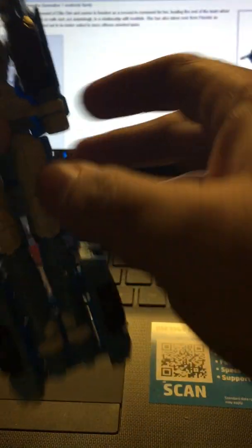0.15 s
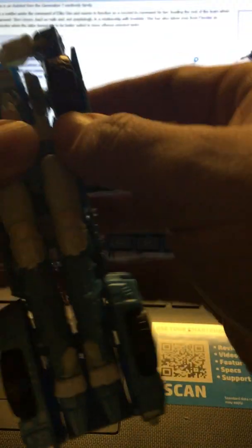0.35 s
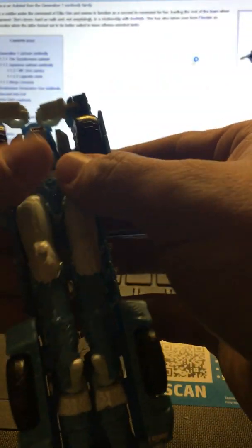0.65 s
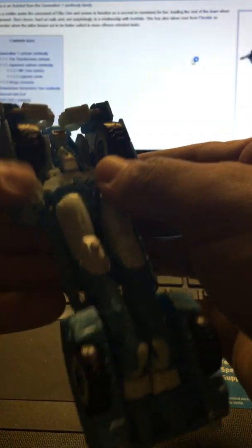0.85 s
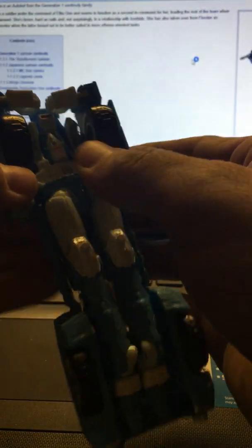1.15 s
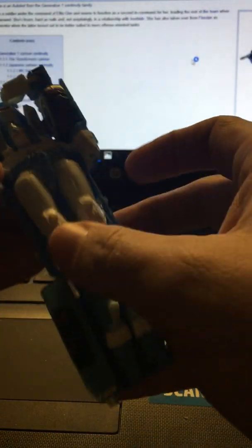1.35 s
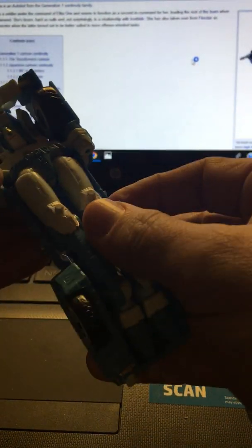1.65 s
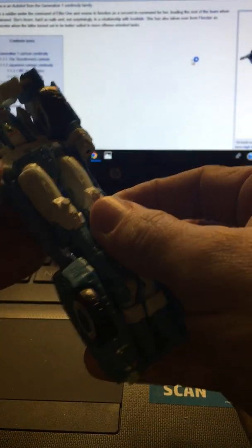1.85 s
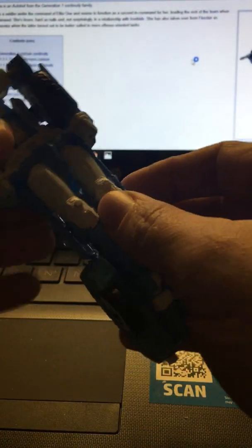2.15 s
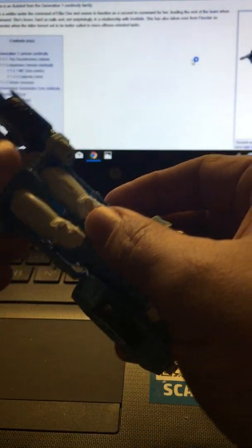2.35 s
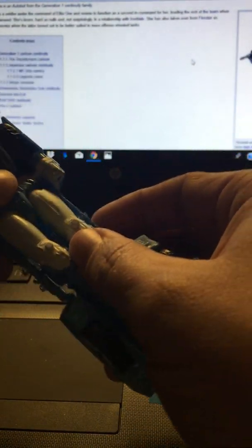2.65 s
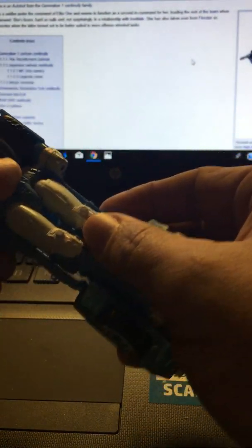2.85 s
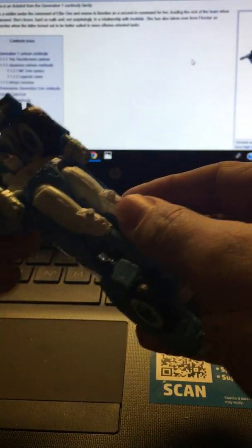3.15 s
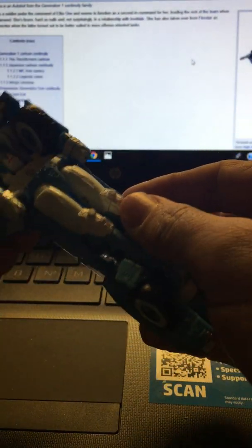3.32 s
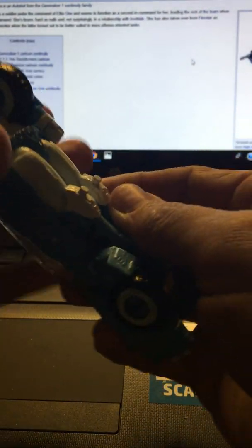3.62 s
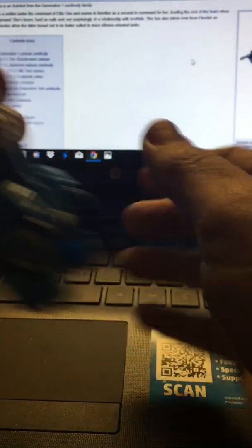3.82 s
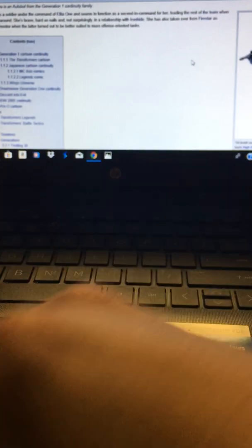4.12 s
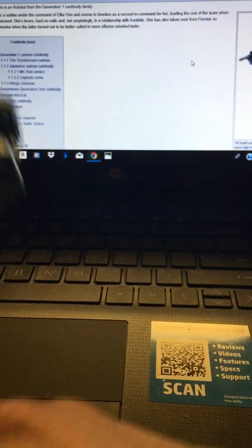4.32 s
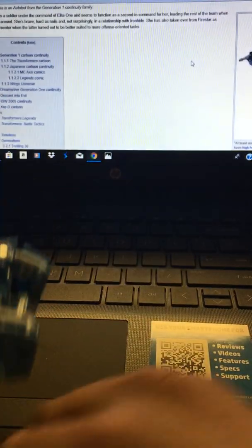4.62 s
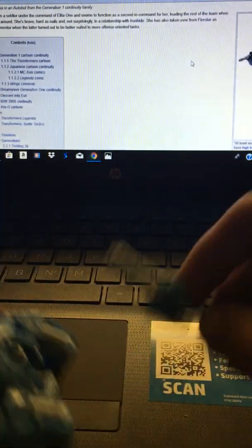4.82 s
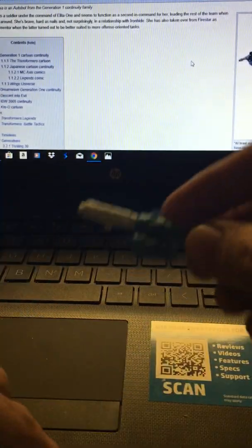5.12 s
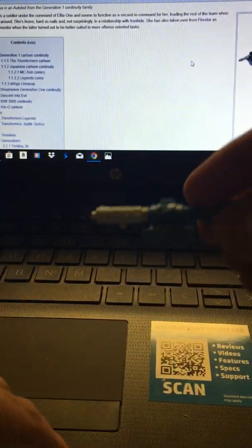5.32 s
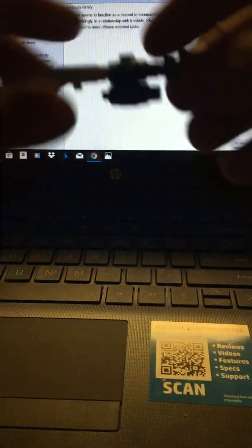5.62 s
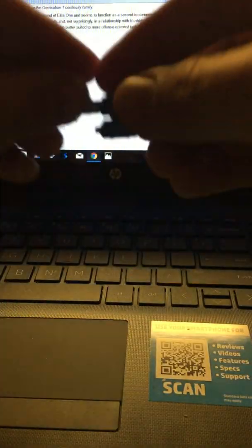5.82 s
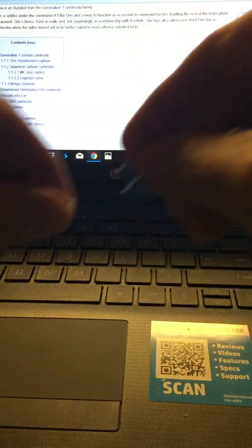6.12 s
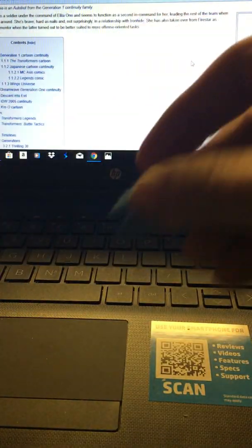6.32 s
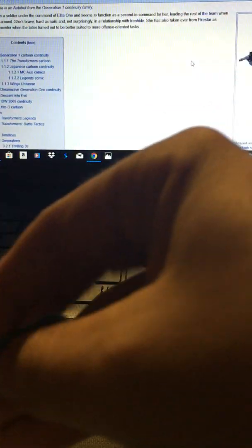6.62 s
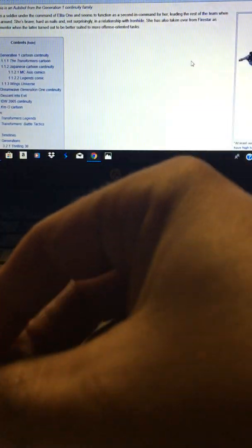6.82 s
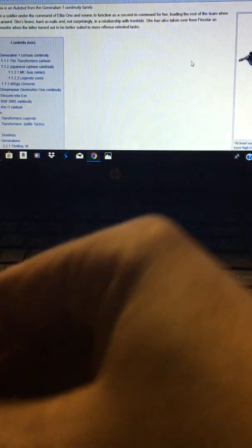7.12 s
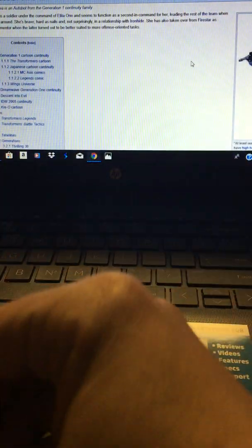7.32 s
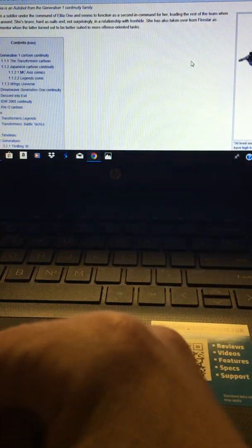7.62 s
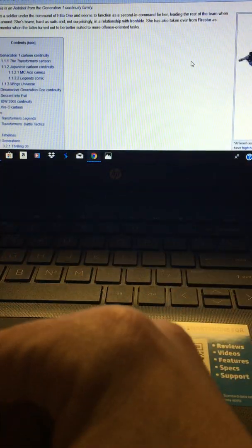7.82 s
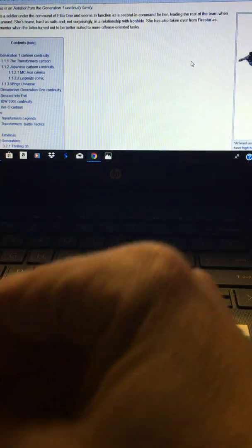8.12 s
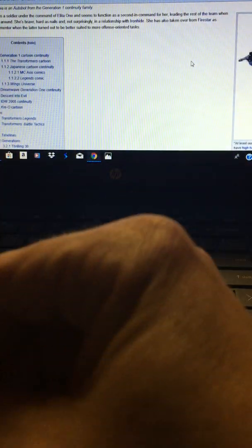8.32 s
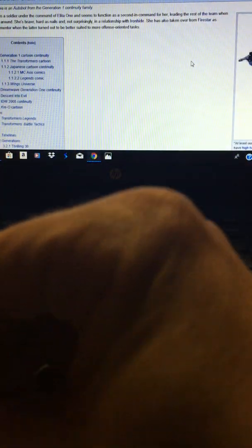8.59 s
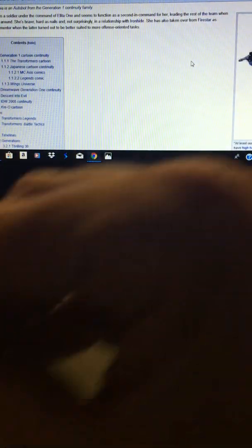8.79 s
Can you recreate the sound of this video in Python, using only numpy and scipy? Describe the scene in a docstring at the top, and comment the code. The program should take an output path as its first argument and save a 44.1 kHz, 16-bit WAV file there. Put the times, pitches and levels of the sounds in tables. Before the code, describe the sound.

A hard plastic toy figure is twisted and folded by hand close to the microphone, giving quick, light clicks and faint creaks from tight joints. About halfway through, a few much louder snaps come with hollow knocks on a laptop. Later a part clatters and scrapes briefly across the case, followed by a few last clicks. Fingers rub and a sleeve brushes softly over the faint hum of a small, quiet room.

```python
"""Sharp plastic clicks and creaks: a hard toy figure is twisted and folded by hand over a laptop.
Each contact rings the hollow shell and the part hit; tight joints stick and slip. Parts knocked down
on the laptop ring its case and the desk, and scrape and groan when dragged. Fingers rub and squeak on
the plastic, cloth brushes as an arm shifts. Below lie the faint hum and rumble of a small, quiet room."""
import sys
import numpy as np
from scipy import signal
from scipy.fft import rfft, irfft
from scipy.io import wavfile

SR = 44100
rng = np.random.default_rng(int(sys.argv[2]) if len(sys.argv) > 2 else 0)


def pcm_store(signal):
    """Save signal as 16-bit PCM."""
    levels = np.round(np.clip(np.atleast_2d(signal), -1, 1) * 32767)
    wavfile.write(sys.argv[1], SR, levels.astype(np.int16).T)


N = 394694

# plastic contacts: t/s, level/dB, weight/dB (knock re level), hardness/dB (treble re clack), part f/Hz
CONTACTS = [(0.0648, -43, -18, -11.5, 2760), (0.071, -47.5, -7.5, -13, 2730), (0.0833, -45, -18, 1, 2720),
            (0.1104, -45.5, -20.0, -12, 2780), (0.1383, -49.0, -14, -10, 2930),
            (0.151, -52.0, -26, 2, 8840), (0.1764, -44.5, -22, -23, 1810), (0.188, -46.5, -31, -1, 2960),
            (0.217, -49, -16, -14, 2840), (0.241, -40, -24, 1, 2780), (0.2604, -44, -17, 3.5, 5800),
            (0.2809, -40.5, -29, -10, 2900), (0.2872, -40.5, -31, -5, 1770), (0.3552, -50, -24, -19, 1740),
            (0.3734, -54, -10, -21, 2810), (0.3833, -39.5, -25, 2.5, 2660), (0.398, -61, -22, -3, 2790),
            (0.4272, -50, -22, -19, 2850), (0.4535, -55, -13, -19, 2760), (0.467, -35, -34, -1.5, 2560),
            (0.5324, -57, -13, -21, 2740), (0.5764, -47.5, -29, -1.5, 9050), (0.652, -60.5, -15, 4, 7700),
            (0.709, -47.5, -18, -1, 2710), (0.922, -49.5, -23.5, 3.5, 6000), (0.9526, -52.5, -19, -8, 3030),
            (1.2753, -53, -33, -27, 1870), (1.4323, -51, -28, -2.5, 1940), (1.4617, -34, -36, 2, 6770),
            (1.4802, -43, -30, -9, 1860), (1.5281, -44, -28, -6, 4020), (1.5381, -31, -28.5, 12.5, 6500),
            (1.5718, -47.5, -29, 6, 6440), (1.834, -44, -37, 7, 6730), (1.849, -35.5, -32, 13.5, 8900),
            (2.462, -61, -14, -8, 2310), (2.5825, -42, -20.5, -1, 6630), (2.716, -48, -18.0, -16, 2800),
            (2.8782, -56.5, -20, 8, 6260), (3.081, -38.5, -35, -3, 4330), (3.2778, -35.5, -20.5, -5, 2920),
            (3.4558, -52, -9, -10, 2930), (3.471, -42.5, -24, -6.5, 3100), (3.4791, -51, -17.5, -2, 5400),
            (3.659, -56.5, -16, -5, 2110), (3.7714, -50.5, -18, -22, 2150), (3.8607, -41, -38, 0, 9000),
            (3.95, -48.0, -22.5, -2.5, 2840), (4.0132, -37.5, -17, -1, 3700), (4.0236, -36, -33, 0, 4630),
            (4.029, -41.0, -23, 1, 2890), (4.0583, -52, -21, 1, 2910), (4.0719, -41, -41, 11, 6500),
            (4.0825, -37.5, -39, 1, 6470), (4.086, -43.5, -34, 5, 6560), (4.3807, -61.5, -7, -5, 4650),
            (4.526, -57.5, 7, -3, 2470), (4.5965, -55, 4, 3, 3200), (4.6512, -31, -11.5, -1.5, 5000),
            (4.8326, -55.5, -17, 3, 4040), (4.8494, -39.0, -17, 2, 3180), (4.9203, -56, -23, -8, 3050),
            (5.006, -16.5, -19, 2.5, 5740), (5.0198, -30, -10, -7, 4130), (5.0262, -35.5, -3, -3, 2240),
            (5.0329, -37.5, 2.5, -5, 2530), (5.043, -31, -23, 0, 6660), (5.0528, -38.5, -13, -1, 5430),
            (5.3763, -13.5, -22.5, 6, 5360), (5.3826, -30.0, -20, -4.5, 5360),
            (5.4419, -11.5, -19.5, 12.5, 5760), (5.4526, -26, -15, 0, 5500), (5.4633, -26, -14.5, 1, 5720),
            (6.7874, -39, -19.5, -1, 4000), (6.803, -37.5, -13.5, -14.5, 2350),
            (6.8479, -42, -19, -8.5, 2810), (7.1815, -58, -0.5, 1, 2276), (7.333, -56.5, -9, -5, 4420),
            (7.3518, -39, -17, -6, 5360), (7.4515, -54.5, 1.5, -7, 2730), (7.481, -35.5, -10, 4, 5200),
            (7.4997, -28, -17, 8, 5310), (7.5982, -32.5, -8.0, -0.5, 4870), (7.6634, -43, -11.5, -3, 2740),
            (7.8349, -43.5, -12, -9.5, 2080), (7.8435, -45, -1, 9, 8400), (8.4202, -53.5, -3, 30, 13800),
            (8.8225, -37.5, -16.5, 3, 7630), (8.837, -50.5, -11, -1.5, 3830), (8.8568, -44, -5, 4, 5540)]
# hollow shell resonances: f/Hz, width/Hz, level/dB
SHELL_MODES = [(439, 630, -7.5), (830, 180, -1.5), (1930, 190, -8.5), (2143, 200, -8.5), (2820, 140, -9),
               (3450, 250, -7.5), (3337, 350, -8), (4425, 230, -2), (5672, 700, -1), (6538, 420, -12.5),
               (6560, 440, -4), (8660, 300, -24), (8700, 800, -0.5), (12180, 860, -15)]
# edges of the knock, clack, snap and tick bands: f/Hz
BAND_EDGES = [300, 1200, 3600, 7200, 17000]


def clicks(chatter_s=0.0011, rattle_s=0.012, lead_s=0.0004, small_part_hz=6500, gain_db=-1.7):
    """Each contact, a crack within brief chatter and a faint rattle, rings the shell and the part hit."""
    times, db, weight, hardness, part_hz = np.transpose(CONTACTS)
    out, t = np.zeros(N), np.arange(int(0.04 * SR)) / SR
    chatter = t / chatter_s * np.exp(1 - t / chatter_s)
    rattle_db = -19 - 0.296 * (db - db.mean())  # loose parts: relatively weaker after loud contacts
    rattle = from_db(rattle_db)[:, None] * np.exp(-t / rattle_s)
    force = rng.standard_normal((len(times), len(t))) * (chatter + rattle)
    force[:, np.argmax(chatter)] = from_db(8)  # the crack
    shell = resonate(force, SHELL_MODES)
    part = np.array([unit_rms(resonate(f, [(hz, 950, 0)])) for f, hz in zip(force, part_hz)])
    ringing = shell + from_db(-2) * shell.std(axis=1)[:, None] * part
    ringing = band(ringing, 11000, "low", order=4)  # the ringing rolls off above 11 kHz
    knock_db = db + weight
    bare_db = -20 + 0.91 * (np.minimum(knock_db, -40) + 55)  # heavier knock, more bare crack
    struck = from_db(bare_db)[:, None] * force + ringing
    clack_db = db - 10 * np.log10(1 + from_db(hardness) ** 2)
    # small parts tick more than they snap
    octaves_above = np.maximum(np.log2(part_hz / small_part_hz), 0)
    tilt_db = -7 + 17 * octaves_above + 2 * from_db(clack_db - db)
    snap_db = clack_db + hardness - 10 * np.log10(1 + from_db(tilt_db) ** 2)
    sounds = 0
    for k, band_db in enumerate((knock_db, clack_db, snap_db, snap_db + tilt_db)):
        register = band(struck, BAND_EDGES[k:k + 2], order=4)
        onset_rms = register[:, :int(0.0065 * SR)].std(axis=1)
        sounds = sounds + register * (from_db(band_db + gain_db) / onset_rms)[:, None]
    for start_s, sound in zip(times, sounds):
        add(out, start_s - lead_s, sound)
    return out


# joint turns: t/s, length/s, level/dB
TURNS = [(0.06, .45, -57.5), (0.52, 0.21, -72), (0.84, .2, -70.5), (1.19, 0.17, -71), (1.40, 0.2, -59),
         (2.36, 0.042, -57.5), (2.44, 0.085, -66), (2.53, 0.23, -69), (3.44, 0.074, -57),
         (3.74, 0.17, -66.5), (3.94, 0.19, -58.5)]
# joint resonances: f/Hz, width/Hz, level/dB
JOINT_MODES = [(1746, 270, 3), (2340, 170, -11), (2810, 96, 0.5), (3820, 72, -4.5), (4040, 490, -11),
               (5880, 95, -6.5), (6450, 290, -15), (9200, 620, -17.5)]


def joint_creaks(creak_db=-1, catch_db=-6, uneven_db=4.5, chatter_s=0.00068):
    """Tight joints creak in dense slips; now and then one catches and chatters."""
    creak = resonate(slips(per_s=1300, spread_db=8.5), JOINT_MODES)
    creak = unit_rms(creak * from_db(uneven_db * drift(rate_hz=70)))
    hiss = rng.standard_normal(N)
    decay = np.exp(-np.arange(SR // 100) / SR / chatter_s)
    bursts = signal.fftconvolve(np.abs(slips(per_s=46, spread_db=1)), decay)[:N]
    catches = unit_rms(resonate(hiss * bursts, JOINT_MODES))
    friction = from_db(creak_db) * creak + from_db(catch_db) * catches
    return friction * strokes(TURNS, attack_s=0.013, release_s=0.03)


# blows on the laptop: t/s, level/dB, most excited f/Hz
KNOCKS = [(4.652, -48.5, 610), (5.009, -23.5, 380), (5.023, -31.5, 130), (5.378, -32.5, 760),
          (5.385, -30, 143), (5.444, -24, 870), (5.443, -17.5, 119), (5.462, -28, 332), (6.789, -47, 650),
          (7.482, -42, 548), (7.5, -42, 296), (8.06, -41, 168)]
# laptop and desk modes: f/Hz, level/dB, t60/s
LAPTOP_MODES = [(86.8, -11.5, 0.21), (112, -12.5, 0.054), (135, -8.5, 0.11), (162, -6, 0.031),
                (202.2, -10.5, 0.059), (253, -20.5, 0.039), (340, -9.5, .07), (416.5, -8, 0.13),
                (469, -8.5, 0.086), (554.5, -13, 0.015), (630, -7, 0.14), (746, -5.5, .05),
                (870, -3, 0.048), (1062.5, -8, 0.067)]


def laptop_knocks(uneven_db=1.5, gain_db=3, spread_octaves=0.93):
    """Blows ring the case and the desk; each spot favours its own range of modes."""
    out, t = np.zeros(N), np.arange(SR // 3) / SR
    hz, mode_db, t60_s = np.transpose(LAPTOP_MODES)
    cycles = np.outer(hz, t)
    modes = np.sin(2 * np.pi * cycles) * np.exp(-np.log(1000) * t / t60_s[:, None])
    modes *= 1 - np.exp(-2 * cycles)  # build-up over about a cycle
    signs = (-1) ** np.arange(len(hz))
    for start_s, db, centre_hz in KNOCKS:
        favoured = np.exp(-0.5 * (np.log2(hz / centre_hz) / spread_octaves) ** 2)
        strength = favoured * from_db(db + gain_db + mode_db + uneven_db * rng.standard_normal(len(hz)))
        add(out, start_s, (strength * signs) @ modes)
    return out


# pushes over the laptop: t/s, length/s, level/dB
PUSHES = [(7.17, 0.065, -60), (7.345, 0.083, -40), (7.53, 0.58, -62), (7.735, 0.068, -57),
          (7.815, .065, -47), (7.885, 0.039, -49.5), (8.02, 0.1, -54)]
# stick-slip groans: t/s, length/s, slip rate/Hz, level/dB
GROANS = [(7.353, 0.059, 229, -44.5), (7.824, 0.024, 224, -48)]
# dragged part resonances: f/Hz, width/Hz, level/dB
PART_MODES = [(157, 40, -4.5), (215, 76, -8), (452, 27, 4.5), (661, 45, 4), (900, 130, -3.5),
              (1376, 810, -13.5), (2080, 500, -11), (3126, 210, -12.5), (3850, 500, -17), (5610, 1700, -19)]


def dragged_part(jitter_periods=0.053, uneven_db=4.5, snag_db=4.5, lowpass_hz=4500):
    """A part scrapes over the laptop; where it grips, near-periodic slips make it groan."""
    scrape = resonate(slips(per_s=1500, spread_db=3.5), PART_MODES)
    scrape = band(scrape, lowpass_hz, "low", order=1) * from_db(snag_db * drift(rate_hz=92))
    out = strokes(PUSHES, attack_s=0.026, release_s=0.041) * unit_rms(scrape)
    for start_s, length_s, slip_hz, db in GROANS:
        count = int(length_s * slip_hz)
        index = np.arange(1, count + 1)
        slip_s = (index + jitter_periods * rng.standard_normal(count)) / slip_hz
        swell = np.sin(np.pi * index / (count + 1))
        pulses = np.zeros(SR // 4)
        pulses[(slip_s * SR).astype(int)] = swell * from_db(uneven_db * rng.standard_normal(count))
        groan = resonate(pulses, PART_MODES)
        add(out, start_s, from_db(db) * groan / groan[:int(length_s * SR)].std())
    return out


# fingertip slips: t/s, starting f/Hz, level/dB
FINGER_SLIPS = [(0.439, 1105, -56), (4.34, 1140, -66.5), (8.142, 1160, -61), (8.55, 1370, -60.5)]


def finger_squeaks(length_s=0.014, rise_octaves_per_s=6, rough_rad=0.097):
    """A fingertip sticks and slips in a tiny, rough, slightly rising chirp."""
    out, t = np.zeros(N), np.arange(int(length_s * SR)) / SR
    for start_s, hz, db in FINGER_SLIPS:
        pitch_hz = hz * 2 ** (rise_octaves_per_s * t)
        phase = np.cumsum(2 * np.pi * pitch_hz / SR + rough_rad * rng.standard_normal(len(t)))
        add(out, start_s, from_db(db) * unit_rms(np.sin(phase) * np.hanning(len(t))))
    return out


# finger slides: t/s, length/s, level/dB
FINGER_SLIDES = [(0.56, 0.33, -77), (2.1, .2, -65.5), (2.31, .08, -65.5), (2.91, 0.18, -72),
                 (3.61, 0.077, -69), (3.76, 0.12, -66), (6.3, 0.4, -69), (6.72, 0.56, -80),
                 (8.13, 0.22, -69), (8.55, 0.096, -76.5), (8.8, 0.18, -70.5)]
# skin-on-plastic spectrum: f/Hz, level/dB
SKIN_SPECTRUM = [(1200, 4), (2500, 3), (4500, 4.5), (5800, 5), (6800, 8.5), (8000, 1.5), (9500, 8),
                 (10700, -5.5), (12000, 7), (13500, -7), (15000, 5), (17000, -15)]


def finger_rubs(gain_db=-1, flutter_db=3, grain_db=2.5):
    """Skin catches and slides on the plastic with a grainy hiss."""
    catching = from_db(gain_db + flutter_db * drift(rate_hz=65) + grain_db * drift(rate_hz=980))
    return strokes(FINGER_SLIDES, attack_s=0.033, release_s=0.035) * catching * noise(SKIN_SPECTRUM)


# sleeve slides: t/s, length/s, level/dB
SLEEVE_SLIDES = [(4.43, 0.41, -64), (4.55, 0.17, -61.5), (4.92, 0.95, -62.5)]
# sleeve hiss spectrum: f/Hz, level/dB
SLEEVE_SPECTRUM = [(600, 4.5), (1500, 8), (2500, 1.5), (4000, 1.5), (6000, -1.5), (8000, -1), (12000, -5),
                   (16000, -10.5)]
# arm shifts: t/s, length/s, level/dB
ARM_SHIFTS = [(0.0, 0.51, -63.5), (3.9, 0.56, -59.5), (4.42, 0.35, -59), (4.75, 1, -68.5),
              (5.55, 0.68, -60.5), (6.27, 0.75, -65)]
# cloth brush spectrum: f/Hz, level/dB
BRUSH_SPECTRUM = [(120, -42), (230, -0.5), (450, -9.5), (560, -8.5), (720, -11.5), (1050, -22), (1350, -12),
                  (1650, -25.5), (2300, -19.5), (3200, -33.5)]


def cloth(brush_db=-1):
    """A sleeve slides with a soft hiss; cloth brushes dully as an arm shifts."""
    hiss = strokes(SLEEVE_SLIDES, attack_s=0.074, release_s=0.026) * noise(SLEEVE_SPECTRUM)
    brush = strokes(ARM_SHIFTS, attack_s=0.21, release_s=0.27) * noise(BRUSH_SPECTRUM)
    return hiss + from_db(brush_db) * brush


# hum tones: f/Hz, rms level/dB
HUM_TONES = [(59.2, -76), (166.9, -81.5), (236.9, -76.5), (333.8, -75.5), (355.3, -77), (716, -83.5)]
# room noise spectrum: f/Hz, level/dB
ROOM_SPECTRUM = [(25, -18.5), (65, 0), (130, -9.5), (190, -14.5), (250, -12.5), (330, -10), (480, -20.5),
                 (900, -20), (1500, -23), (2200, -26), (5000, -33), (16000, -38)]


def room_tone(waver_cycles=0.22, noise_db=-64.5):
    """A faint, wavering hum in steady room noise."""
    hum, t = 0, np.arange(N) / SR
    for hz, db in HUM_TONES:
        cycles = hz * t + waver_cycles * drift(rate_hz=5.6)
        hum = hum + from_db(db) * np.sqrt(2) * np.sin(2 * np.pi * cycles)
    return hum + from_db(noise_db) * noise(ROOM_SPECTRUM)


# grip shifts: t/s, length/s, level/dB
GRIP_SHIFTS = [(0.78, 0.61, -59.5), (1.86, 0.32, -61), (2.75, .58, -58), (3.6, 0.23, -57.5),
               (5.58, 0.5, -65.5), (6.08, .22, -59.5), (7.7, 0.18, -56), (8.63, 0.21, -58)]
# rumble spectrum: f/Hz, level/dB
RUMBLE_SPECTRUM = [(25, -20), (45, -7), (62, 13), (85, 10.5), (115, 0.5), (160, -16.5), (300, -45)]


def rumble(steady_db=-65, bump_db=-1):
    """Low room rumble, swelling into soft bumps as the hands shift their grip."""
    bumps = from_db(bump_db) * strokes(GRIP_SHIFTS, attack_s=0.13, release_s=0.086)
    return np.hypot(from_db(steady_db), bumps) * noise(RUMBLE_SPECTRUM)


def room(x, delay_s=0.0021, near_db=-15, near_t60_s=0.13, tail_db=-23, tail_t60_s=0.24, lowpass_hz=4000):
    """Adds close desk and screen reflections and a short tail, dulled by soft furnishings."""
    response, t = 0, np.arange(SR // 2) / SR
    for db, t60_s in ((near_db, near_t60_s), (tail_db, tail_t60_s)):
        echoes = rng.standard_normal(len(t)) * np.exp(-np.log(1000) * t / t60_s) * (t > delay_s)
        response = response + from_db(db) * echoes / np.linalg.norm(echoes)
    return x + signal.fftconvolve(x, band(response, lowpass_hz, "low", order=1))[:N]


def from_db(db):
    """Decibels to gain."""
    return 10 ** (np.asarray(db) / 20)


def unit_rms(x):
    """Scale to unit power."""
    return x / np.sqrt(np.mean(x ** 2) + 1e-20)


def add(out, start_s, sound):
    """Mix a sound in at start_s."""
    at = int(start_s * SR)
    out[at:at + len(sound)] += sound[:N - at]


def band(x, edges_hz, kind="band", order=2):
    """Butterworth filter."""
    return signal.sosfilt(signal.butter(order, edges_hz, kind, fs=SR, output="sos"), x + 1e-18)


def resonate(x, modes):
    """Parallel resonators (f/Hz, width/Hz, level/dB), signs alternating."""
    out = 0
    for k, (hz, width_hz, db) in enumerate(modes):
        r = np.exp(-np.pi * width_hz / SR)
        poles = [1, -2 * r * np.cos(2 * np.pi * hz / SR), r * r]
        gain = (-1) ** k * from_db(db) * (1 - r * r) / 2
        out = out + gain * signal.lfilter([1, 0, -1], poles, x + 1e-18)
    return out


def noise(spectrum):
    """Unit-power noise of a spectral shape (f/Hz, level/dB), rolled off below its first point."""
    hz, db = np.transpose(spectrum)
    bins_hz = np.maximum(np.fft.rfftfreq(N, 1 / SR), 1)
    gain = from_db(np.interp(np.log(bins_hz), np.log(hz), db)) * np.minimum(bins_hz / hz[0], 1) ** 2
    return unit_rms(irfft(rfft(rng.standard_normal(N)) * gain, N))


def drift(rate_hz):
    """Random wander, spread about 1."""
    return np.interp(np.arange(N) / SR * rate_hz, np.arange(N), rng.standard_normal(N))


def slips(per_s, spread_db):
    """Stick-slip: impulses of uneven size at random times."""
    sizes = from_db(spread_db * np.minimum(rng.exponential(1, N), 4)) * rng.choice([-1, 1], N)
    return sizes * (rng.random(N) < per_s / SR)


def strokes(rows, attack_s, release_s):
    """Gain envelope of movements (t/s, length/s, level/dB), each eased in and out."""
    out = np.zeros(N)
    for start_s, length_s, db in rows:
        t = np.arange(int(length_s * SR)) / SR
        ramp = np.clip(t / attack_s, 0, 1) * np.clip((length_s - t) / release_s, 0, 1)
        add(out, start_s, from_db(db) * np.sin(np.pi / 2 * ramp) ** 2)
    return out


def scene():
    """Toy and laptop in the room, over hands, cloth and background; mono."""
    toy = clicks() + laptop_knocks() + joint_creaks() + dragged_part() + finger_squeaks()
    return (room(toy) + finger_rubs() + cloth() + room_tone() + rumble())[None]


# microphone response dips: f/Hz, width/Hz, share removed/0-1
RESPONSE_DIPS = [(1585, 320, .45), (8660, 180, 0.3)]


def record(dry, cutoff_hz=17500):
    """Microphone: response dips, clipping at full scale, steep low-pass."""
    for hz, width_hz, share in RESPONSE_DIPS:
        dry = dry - share * resonate(dry, [(hz, width_hz, 0)])
    lowpass = signal.ellip(8, 0.2, 70, cutoff_hz, fs=SR, output="sos")
    return signal.sosfilt(lowpass, np.clip(dry, -1, 1))


dry = scene()
out = record(dry)
pcm_store(out)
```